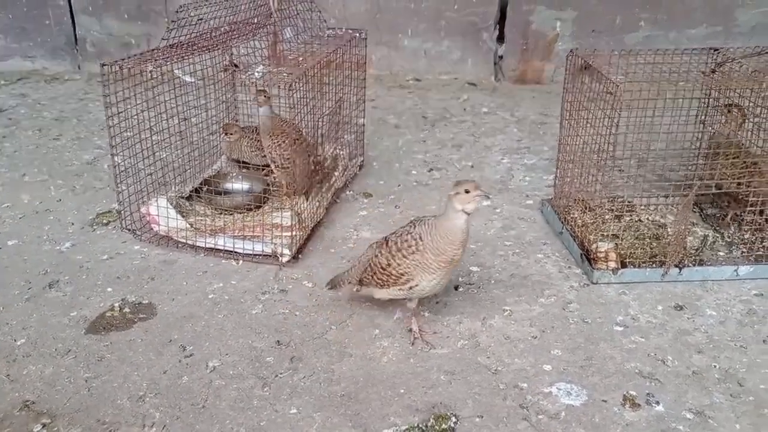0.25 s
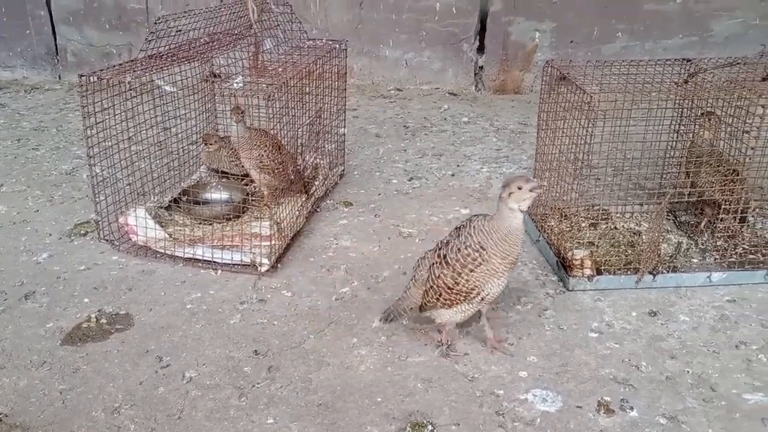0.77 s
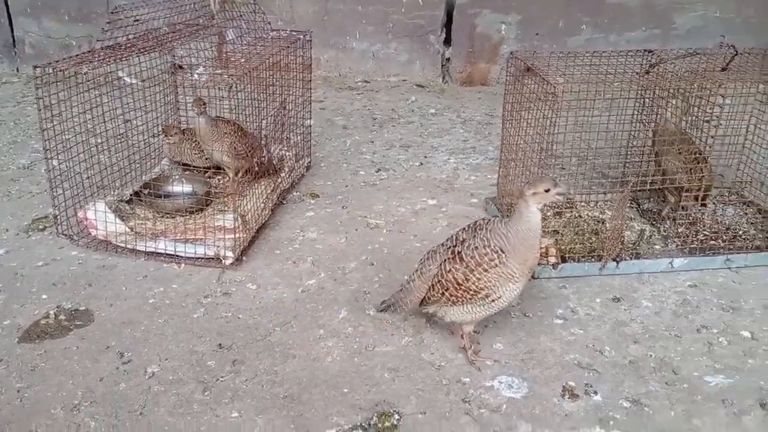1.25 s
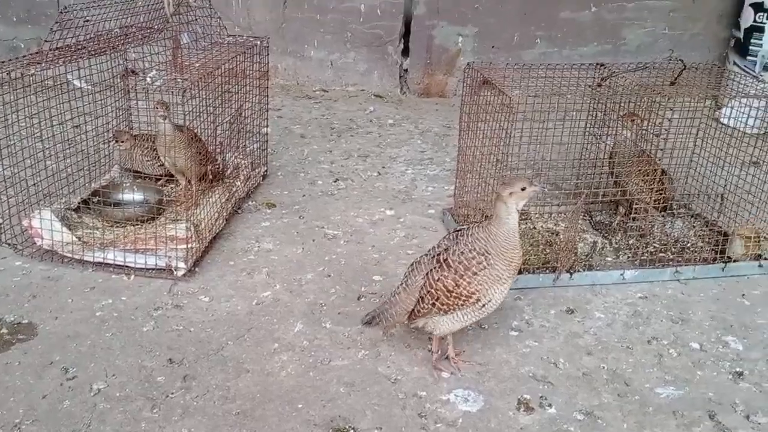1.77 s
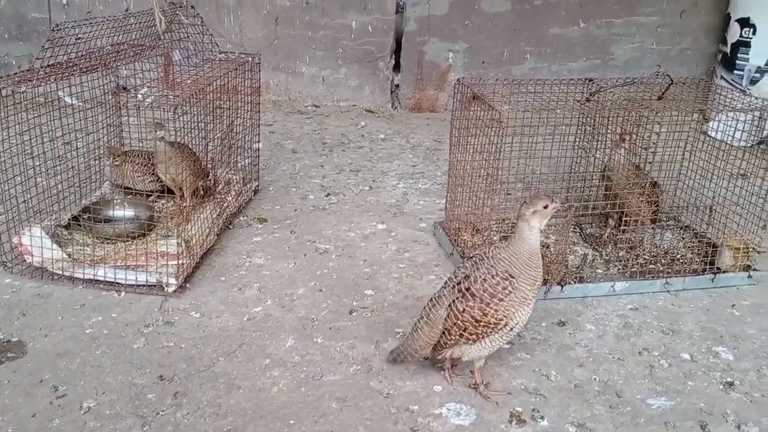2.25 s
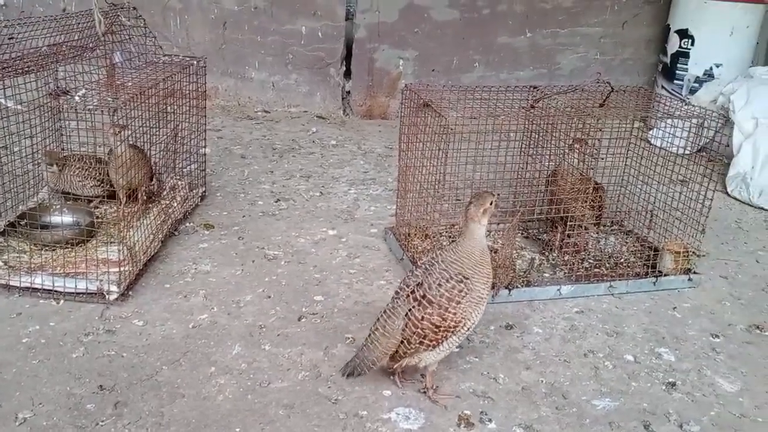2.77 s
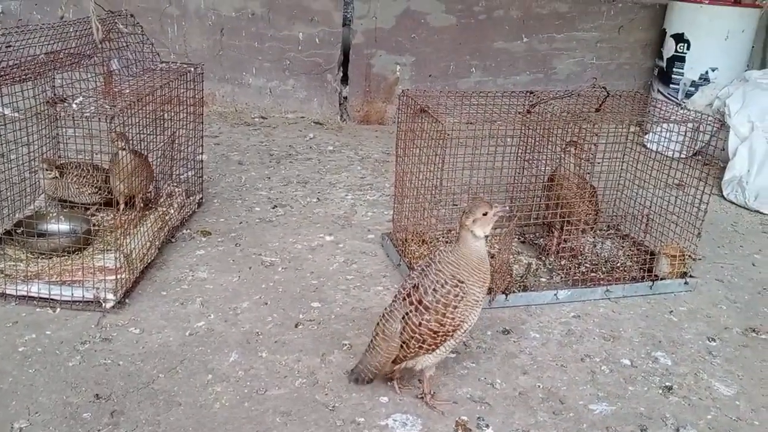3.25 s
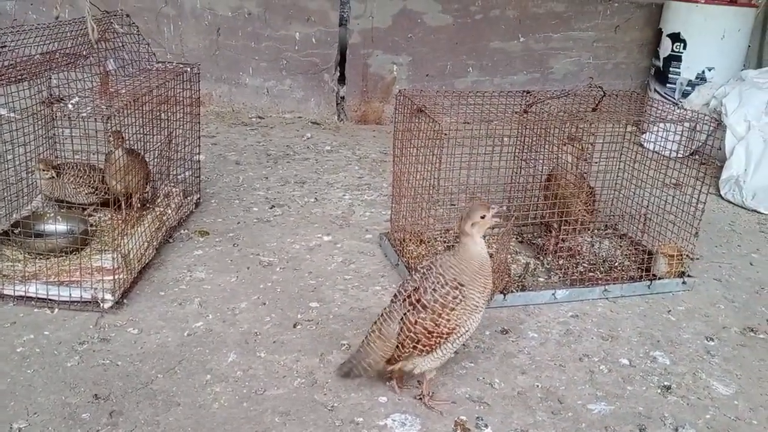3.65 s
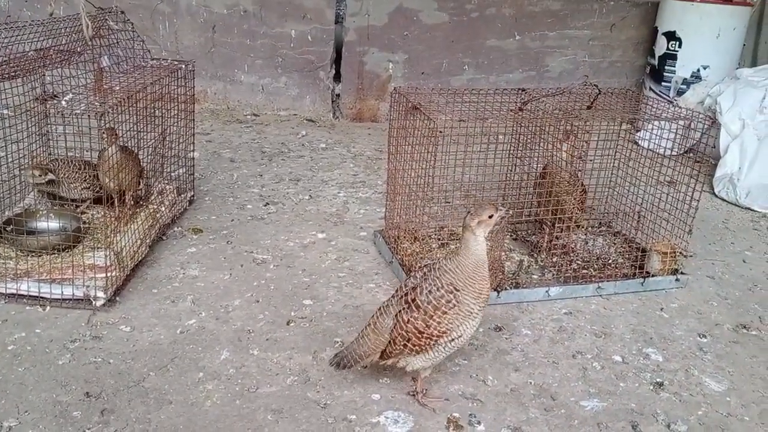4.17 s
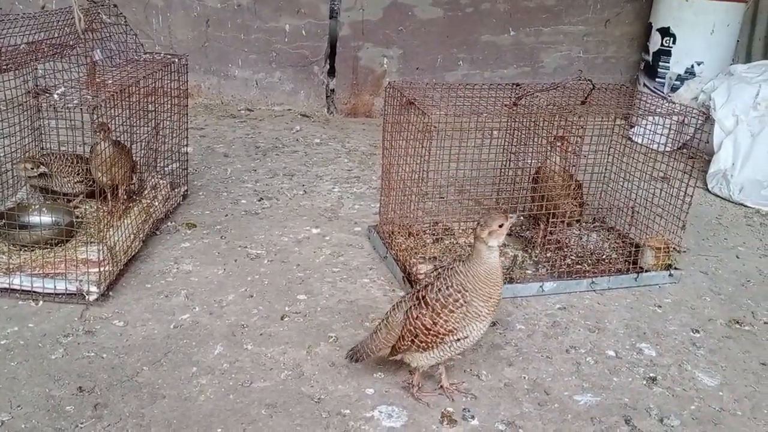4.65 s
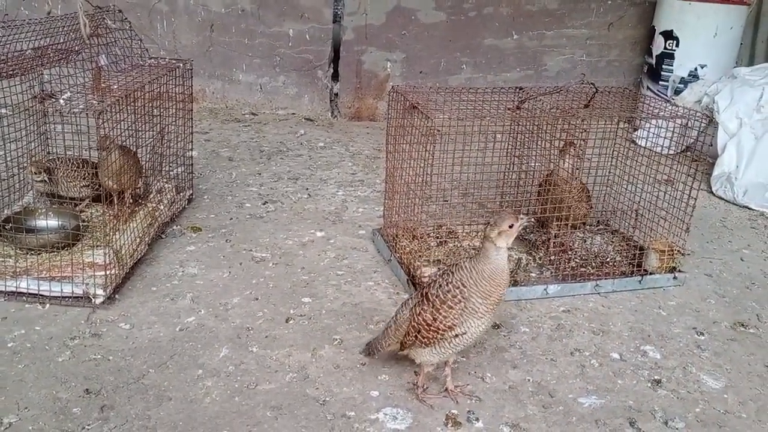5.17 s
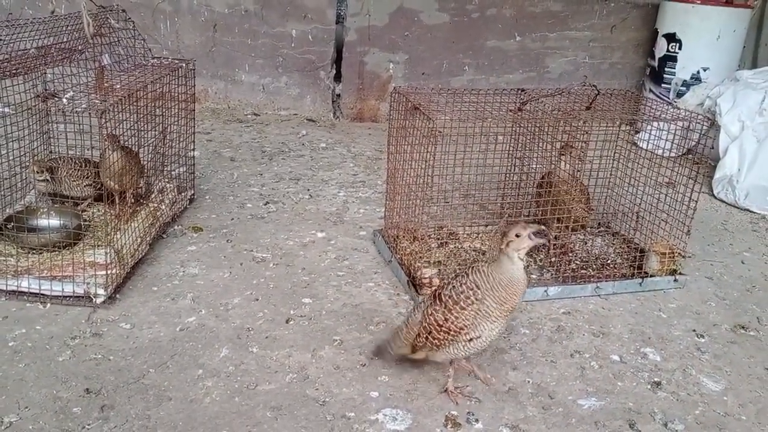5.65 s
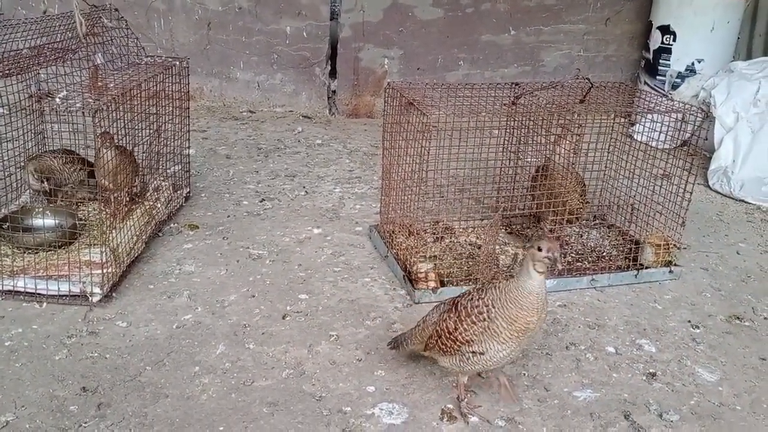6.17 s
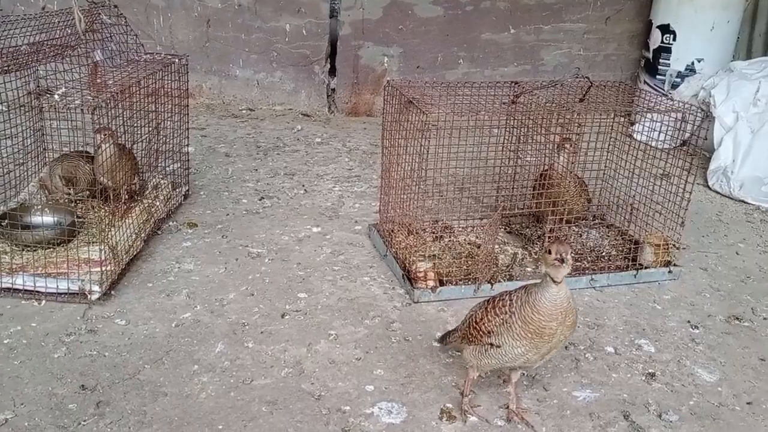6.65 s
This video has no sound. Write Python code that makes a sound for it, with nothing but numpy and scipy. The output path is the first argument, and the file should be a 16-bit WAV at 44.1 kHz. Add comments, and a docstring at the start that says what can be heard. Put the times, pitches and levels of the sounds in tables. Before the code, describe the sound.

Two partridge-like birds duet loudly in a hard-walled concrete yard. One, close to the phone, gives five short clear rising whistles in the first two and a half seconds. The other repeats a harsh cluck, a piercing high note that cracks, a strident falling note and low rasps, about every 0.6 seconds to the end. Short dense echoes, slight overload crackle, faint hollow knocks and low thumps.

```python
"""Two game birds in duet

One bird whistles a rising note near a phone in a walled concrete yard. The other repeats a harsh cluck,
a high note that breaks, a held note that falls, and low rasps. Notes are stacks of partials, blurred by
roughness, plus breath noise. Knocks are decaying sines; a scrape, low thumps and the floor are coloured noise.
The walls answer with dense noise tails; noise suppression, gain control and peak flattening follow."""
import sys
import numpy as np
from scipy import signal
from scipy.fft import rfft, irfft, next_fast_len
from scipy.io import wavfile
from scipy.ndimage import uniform_filter1d

SR = 44100
rng = np.random.default_rng(int(sys.argv[2]) if len(sys.argv) > 2 else 0)


def ratio(d):
    """dB to gain"""
    e = np.asarray(d, float) / 20
    return 10 ** e


def waveform_to_disk(signal):
    """Save audio, clipped to [-1, 1], as 16-bit WAV at the path in sys.argv[1]."""
    frames = np.transpose(np.atleast_2d(signal))
    scaled = np.clip(frames, -1, 1) * 32767
    samples = np.round(scaled).astype(np.int16)
    wavfile.write(sys.argv[1], SR, samples)


N = 304290

# rising whistles: start_s, length_s, level_db, pitch_start_hz, pitch_middle_hz, pitch_end_hz
WHISTLES = [(-.06, 0.16, -5, 3590, 3747, 4325), (.585, 0.16, -3.5, 2950, 3690, 4070),
            (1.162, 0.18, -2.5, 2794, 3552, 3990), (1.777, .165, -4.5, 3282, 3575, 4086),
            (2.42, 0.16, -6.5, 3456, 3750, 4094)]
# course of a whistle: share_of_length, level_db, other_partials_db, roughness_0_1
WHISTLE_COURSE = [(0, -24, 6, 0.5), (.18, -15, 1, 0.1), (0.332, -1, -1.5, 0.05), (0.601, 0.5, 10.5, 0.09),
                  (0.769, -17, 1.5, 0.22), (0.899, -11, 0.5, 0.24), (1, -18.5, 7, 0.4)]
# hoarse undertone, before its event factors: time_s, pitch_hz, level_db, other_partials_db, roughness_0_1
UNDERTONE = [(0, 2700, -6, 0.0045, .9), (.02, 2970, -5.5, 0, 1), (.08, 2804, -2.5, 0, 0.62),
             (.16, 2797, -9, 0.0022, .7)]
UNDERTONE_DB = -21.5  # re its whistle

# notes whose level beats with the walls' echo:
# start_s, time_to_first_peak_s, time_on_to_last_peak_s, first_peak_db, last_peak_db, pitch_hz
HIGH_NOTES = [(1.338, .035, .036, -5.5, -7, 3414), (2.42, 0.012, 0.066, -6, -3.5, 3515),
              (3.12, 0.035, 0.042, -7.5, -1.5, 3568), (3.683, 0.018, 0.051, -7.5, 4.5, 3558),
              (4.236, 0.023, 0.055, -7, 2, 3578), (4.95, 0.026, .05, -8, -1.5, 3584),
              (5.655, .024, .051, -5.5, -6, 3594), (6.228, 0.027, 0.051, -4.5, -5, 3597)]
HELD_NOTES = [(.235, 0.041, .027, -11, -8.5, 2496), (.82, 0.041, 0.04, -12, -4, 2550),
              (1.425, 0.045, 0.048, -8, -3, 2530), (2.06, 0.041, 0.061, -8.5, 1.5, 2508),
              (2.525, 0.06, .059, -10, 1, 2543), (3.24, 0.041, .055, -9, 1, 2548),
              (3.8, 0.051, .067, -8.5, 2, 2525), (4.35, .064, .046, -4.5, -3.5, 2516),
              (5.062, 0.051, .052, -5.5, -4, 2510), (5.77, 0.059, .036, -7.5, -8, 2522),
              (6.35, 0.053, .06, -6.5, -3, 2532)]
# beat: lead_in_db, soft_share_of_lead_in, dip_db, dip_place_0_1, other_partials_lead_in_db,
# other_partials_after_db, roughness_lead_in_0_1, roughness_after_0_1
HIGH_BEAT = (-6, 0.85, -6.5, 0.67, 5, 5, 0.25, 0.02)
HELD_BEAT = (-22, 0.68, -7.5, 0.56, 12.5, 0, .5, 0.3)
HIGH_LEAD_PITCH_FACTOR, HELD_LEAD_PITCH_FACTOR = 0.99, 1.05
BREAK_LEAD_S, BREAK_LEVEL_DB = 0.013, -15.5  # crack starts this long before the high note ends

# short syllables, before event factors: time_s, pitch_hz, level_db, other_partials_db, roughness_0_1
TICK = [(0, 2350, 1.5, -0.026, .05), (.005, 2440, -11.5, -0.09, .05), (.011, 2450, -5, -.1, .1)]
CLUCK = [(0, 2320, -5, -7, 0.8), (.008, 2300, 2, -12, 0.9), (.018, 2320, -2.5, 2, 0.7),
         (.032, 2200, -4, -6, 1), (.046, 2160, -19.5, 14.5, .9)]
BREAK = [(0, 2950, -4.5, -0.14, 1), (.008, 2900, 5.5, -0.073, .85), (.025, 2850, -3.5, -.1, .9),
         (.055, 2770, -10, -0.13, 0.87)]
SLIDE = [(0, 2520, 2.5, 0.3, 0.08), (.02, 2300, -6.5, -0.5, .15), (.045, 1950, -12.5, -7.5, 0.13),
         (.065, 1880, -31.5, -6, 0.26)]
STEP = [(0, 2100, -12, 18, .15), (.025, 2060, -8, 13, .2), (.038, 2010, 0, 0, .2), (.065, 1930, -9, -4, .4)]
RASP = [(0, 720, -24, -14, .15), (.01, 1050, -14, -9, .3), (.024, 1300, -6, -2, .7),
        (.042, 1400, -7, -4, .6), (.05, 1760, 0, -14, .22), (.075, 1700, 0, -15, .22),
        (.1, 1600, -9, -15, .25)]
# syllable events: start_s, level_db, pitch_factor, length_factor (later limited)
TICKS = [(2.373, -27, 0.9, 0.74), (3.075, -20.5, 1.01, 2.2), (3.636, -16.5, 1.01, 1.01),
         (4.186, -32, 2.4, 1.5), (4.9, -25.5, .99, 0.71), (5.605, -46, 1.1, 0.44), (6.181, -18, .99, 0.73)]
CLUCKS = [(.193, -16.5, 1.01, 1.36), (0.791, -15.5, 1.09, 0.91), (2.023, -16.5, 1.095, 1.7),
          (2.378, -17, 1.14, 0.93), (3.079, -16, 1.146, 0.75), (3.641, -14.5, 1.08, 1),
          (4.19, -19, 1.01, 1.094), (4.905, -15.5, 1.045, 0.82), (5.608, -19.5, 1.01, 1),
          (6.182, -16, 1.16, 0.97)]
SLIDES = [(0.298, -8.5, 0.96, 1.06), (.9, -5.5, 0.98, 1.24), (4.47, -10, 0.97, 1.22),
          (5.171, -6.5, 1, 0.51), (5.87, -7.5, 0.99, 1.4), (6.461, -4, 1, 0.93)]
STEPS = [(1.52, -18, 0.98, 1), (2.158, -15.5, .97, 0.82), (2.644, -14.5, 1.04, 0.89),
         (3.331, -13.5, 1.005, 0.9), (3.918, -16.5, 1.02, 0.98)]
RASPS = [(.43, -22, 0.76, 0.9), (1.034, -17, 0.95, 0.85), (1.636, -14.5, 1, 0.9),
         (2.266, -15.5, 1.037, 0.82), (2.768, -14, 1.054, 0.95), (2.924, -17.5, 0.94, 0.96),
         (3.474, -15.5, 0.9, 1), (4.052, -15.5, 1, 0.99), (4.601, -14, 1.013, 0.87),
         (4.768, -20, 0.85, 0.9), (5.296, -13.5, 1.01, 0.85), (5.456, -19.5, 0.89, 0.85),
         (6.018, -15.5, 0.94, 0.92), (6.606, -13, 0.98, 0.8), (6.766, -20.5, 0.77, 0.67)]

# partials 1, 2, 3, .. of each kind of note: level_db
WHISTLE_PARTIALS_DB = [0, -45]
TICK_PARTIALS_DB = [4.5, 10.5, 2]
CLUCK_PARTIALS_DB = [-6.5, -12.5, 1.5, -7.5, -13.5, -20.5]
HIGH_PARTIALS_DB = [3, -14.5, -50, -35.5]
BREAK_PARTIALS_DB = [-3, -19]
HELD_PARTIALS_DB = [-18, 1.5, -19, -14, -25.5, -20.5]
SLIDE_PARTIALS_DB = [-40, 2, -24, -13, -23.5, -21.5]
STEP_PARTIALS_DB = [-26, 0, -12, -26, -26, -22]
RASP_PARTIALS_DB = [-1.5, -9.5, -27]

# colour of the partials: frequency_hz, level_db
PARTIAL_COLOUR = [(500, -51), (800, -23), (1100, -2), (1800, 10.5), (3600, 17.5), (4500, 6.5), (5400, 13.5),
                  (7000, 15), (7800, -19), (9000, -69.5), (16000, -43)]
# spread of a rough partial: distance_hz, relative_db_per_hz
SHAKE = [(30, 13.5), (150, 9.5), (350, 0.5), (900, -21.5), (2500, -38.5)]
# breath noise: frequency_hz, relative_db_per_hz
BREATH = [(600, -44.5), (1000, -16), (1800, -15.5), (3500, 6), (4400, -13), (5500, -7.5), (7000, -12),
          (7800, -29), (9000, -41), (16000, -66.5)]

# knocks, before mixing: start_s, level_db, pitch_hz, t60_s
KNOCKS = [(0.164, -27, 374, 0.028), (0.174, -24, 372, 0.022), (2.962, -28, 578, 0.08),
          (3.037, -22.5, 395, 0.04), (4.817, -30, 550, 0.057), (5.48, -32, 514, 0.091),
          (5.905, -39, 520, 0.12), (5.984, -37, 410, 0.11), (6.018, -38, 360, 0.077),
          (6.51, -40, 450, 0.069), (6.571, -42, 469, .08), (6.621, -31, 525, 0.089),
          (6.77, -31.5, 565, 0.066), (6.879, -44, 287, 0.04)]
# claw scrape: frequency_hz, relative_db_per_hz
SCRAPE = [(500, -17), (1000, -8), (4000, -5), (7000, -22), (9000, -49.5)]
# energy of the walls' answer: time_s, relative_db
YARD = [(0, -1.5), (.02, 8.5), (.07, -1.5), (.12, -6.5), (.14, -9.5), (.3, -56), (.6, -57.5)]
# colour of the walls' answer: frequency_hz, level_db
WALLS = [(300, -6), (1100, -3), (1600, 2.5), (2500, 0), (3600, -4), (7000, -6)]
# low thumps: start_s, level_db, decay_s (to exp(-2))
THUMPS = [(0.319, -49, 0.04), (0.923, -41, 0.051), (1.345, -26, 0.022), (1.374, -35, 0.064),
          (1.501, -50, 0.036), (2.15, -45, 0.056), (2.446, -31, 0.04), (2.459, -17, 0.04),
          (2.495, -33.5, 0.05), (2.623, -34, 0.059), (3.15, -48.5, 0.066), (3.32, -32.5, 0.042),
          (3.729, -41, 0.031), (3.9, -35, 0.052), (4.294, -36.5, 0.033), (4.412, -27.5, 0.01),
          (4.443, -49.5, 0.11), (5.158, -49, 0.064), (5.876, -39.5, 0.052), (6.401, -36, 0.033),
          (6.463, -31, 0.039)]
# thump noise: frequency_hz, relative_db_per_hz
THUMP = [(25, -39.5), (70, -3.5), (130, 4), (250, -7), (500, -11), (1200, -27.5), (3000, -72.5)]
# background floor: frequency_hz, relative_db_per_hz
FLOOR = [(30, -9.5), (130, 1.5), (600, -7), (1300, -4.5), (2700, -23), (4400, -6.5), (7000, -11),
         (9000, -58.5), (13500, -26), (15800, -34.5)]


def unit(x):
    """Scale to rms 1."""
    return x / np.sqrt(np.mean(x ** 2) + 1e-20)


def along(points, hz):
    """Interpolate (Hz, value) points on a log frequency axis."""
    point_hz, values = np.transpose(points)
    return np.interp(np.log(hz + 1), np.log(point_hz + 1), values)


def filtered(x, response):
    """Weight the spectrum of x by a function of frequency."""
    size = next_fast_len(len(x) + 8192)
    spectrum = rfft(x, size) * response(np.fft.rfftfreq(size, 1 / SR))
    return irfft(spectrum, size)[:len(x)]


def noise(spectrum):
    """Coloured Gaussian noise of rms 1."""
    return unit(filtered(rng.standard_normal(N), lambda hz: ratio(along(spectrum, hz))))


def whistler():
    """Bird facing the phone: whistles upward over a hoarse, nearly level undertone."""
    share, course_db, others_db, rough = np.transpose(WHISTLE_COURSE)
    rising, under = [], []
    for start_s, length_s, level_db, *pitches_hz in WHISTLES:
        pitch_hz = np.polyval(np.polyfit([0, 0.5, 1], pitches_hz, 2), share)
        time_s = start_s + share * length_s
        rising.append(np.transpose([time_s, pitch_hz, level_db + course_db, others_db, rough]))
        under.append((start_s, level_db + UNDERTONE_DB, 1, 1))
    return voice((rising, WHISTLE_PARTIALS_DB, 1, -5),
                 (placed(UNDERTONE, under), WHISTLE_PARTIALS_DB, 1, -8))


def caller():
    """Bird calling toward the wall: high and held notes and short syllables; clucks and rasps breathiest."""
    breaks = [(start_s + rise_s + hold_s - BREAK_LEAD_S, BREAK_LEVEL_DB, 1, 1)
              for start_s, rise_s, hold_s, *_ in HIGH_NOTES]
    high = echo_beaten(HIGH_NOTES, HIGH_LEAD_PITCH_FACTOR, HIGH_BEAT)
    held = echo_beaten(HELD_NOTES, HELD_LEAD_PITCH_FACTOR, HELD_BEAT)
    # notes, partial levels, number of the partial that carries the pitch, breath_db
    return voice((placed(TICK, TICKS), TICK_PARTIALS_DB, 1, -14),
                 (placed(CLUCK, CLUCKS), CLUCK_PARTIALS_DB, 2, -3),
                 (high, HIGH_PARTIALS_DB, 1, -14),
                 (placed(BREAK, breaks), BREAK_PARTIALS_DB, 1, -7),
                 (held, HELD_PARTIALS_DB, 2, -15),
                 (placed(SLIDE, SLIDES), SLIDE_PARTIALS_DB, 2, -14),
                 (placed(STEP, STEPS), STEP_PARTIALS_DB, 2, -14),
                 (placed(RASP, RASPS), RASP_PARTIALS_DB, 1, -2))


def echo_beaten(notes, lead_pitch_factor, beat):
    """Soft lead-in, then a level that beats with the walls' echo, drawn as peak, dip, peak."""
    lead_db, soft, dip_db, place, early_db, late_db, hoarse, rough = beat
    soft, place = np.clip([soft, place], 0.1, 0.9)
    shaped = []
    for start_s, rise_s, hold_s, first_db, last_db, hz in notes:
        lead_hz, peak_s = hz * lead_pitch_factor, start_s + rise_s
        shaped.append([
            (start_s, lead_hz, first_db + lead_db, early_db, hoarse),
            (start_s + soft * rise_s, lead_hz, first_db + lead_db / 2, early_db, hoarse),
            (peak_s, hz, first_db, late_db, rough),
            (peak_s + place * hold_s, hz, min(first_db, last_db) + dip_db, late_db, rough),
            (peak_s + hold_s, hz, last_db, late_db, rough)])
    return shaped


def placed(shape, events):
    """Move, stretch and transpose a syllable for each event."""
    return [np.array(shape) * [np.clip(length, 0.75, 1.3), pitch, 1, 1, 1] + [start_s, 0, level_db, 0, 0]
            for start_s, level_db, pitch, length in events]


def voice(*kinds):
    """One dry bird: sums its notes; a high-pass keeps the lows dark."""
    out = np.zeros(N)
    shake = (noise(SHAKE) + 1j * noise(SHAKE)) / np.sqrt(2)
    breath = noise(BREATH)
    for notes, partials_db, order, breath_db in kinds:
        for rows in notes:
            add_note(out, rows, partials_db, order, shake, ratio(breath_db) * breath)
    return filtered(out, lambda hz: 1 / (1 + (750 / (hz + 1)) ** 6))


def add_note(out, rows, partials_db, order, shake, breath):
    """Add a harmonic stack whose partial number `order` has the given pitch; roughness smears partials."""
    time_s, *columns = np.transpose(rows)
    at = np.arange(max(round(time_s[0] * SR), 0), min(round(time_s[-1] * SR), N))
    hz, level_db, others_db, rough = [np.interp(at / SR, time_s, c) for c in columns]
    rough = np.clip(rough, 0, 1)
    k = np.arange(1, len(partials_db) + 1)[:, None]
    carrier = np.exp(2j * np.pi * k * np.cumsum(hz / order) / SR)
    # higher partials are smeared more, and over a wider band
    noise_share = 1 - (1 - rough) ** (k / order)
    wobble = shake[(at * k // order + k * SR) % N]
    smear = np.sqrt(1 - noise_share) + np.sqrt(noise_share) * wobble
    colour_db = along(PARTIAL_COLOUR, k * hz / order) - along(PARTIAL_COLOUR, hz)
    partial_db = np.array(partials_db)[:, None] + (k != order) * others_db + colour_db
    stack = ratio(partial_db) * (carrier * smear).imag
    # 4 ms fades; no fade-in on a note already sounding at time 0
    since_start = at - at[0] + (at[0] == 0) * SR
    edge = np.clip(np.minimum(since_start, at[-1] - at) / (0.004 * SR), 0, 1)
    out[at] += ratio(level_db) * edge * (np.sqrt(2) * stack.sum(0) + rough * breath[at])


def knocks():
    """Dull hollow knocks: decaying sines with a soft contact."""
    out, t = np.zeros(N + SR), np.arange(SR // 4) / SR
    for start_s, level_db, hz, t60_s in KNOCKS:
        decay = ratio(level_db - 60 * t / max(t60_s, 0.01))
        contact = 1 - np.exp(-t / 0.006)
        out[round(start_s * SR):][:len(t)] += decay * contact * np.sin(2 * np.pi * hz * t)
    return out[:N]


def scrape():
    """A claw scrapes the concrete: a short gated burst of coloured noise."""
    start_s, length_s, level_db = 0.153, 0.038, -33.5
    share = (np.arange(N) / SR - start_s) / length_s
    return ratio(level_db) * ((share > 0) & (share < 1)) * noise(SCRAPE)


def yard(x):
    """The walls' dense answer: noise tails, redrawn every quarter second."""
    t, hop = np.arange(int(0.6 * SR)) / SR, SR // 4
    shape = ratio(np.interp(t, *np.transpose(YARD)))
    window = np.sqrt(np.hanning(2 * hop))
    padded = np.pad(x, (hop, 2 * hop))
    out = np.zeros(N + 4 * hop + len(t))
    for at in range(0, N + hop, hop):
        tail = shape * rng.standard_normal(len(t)) / np.linalg.norm(shape)
        piece = signal.fftconvolve(padded[at:at + 2 * hop] * window, tail)
        out[at:at + len(piece)] += piece
    return out[hop:hop + N]


def thumps():
    """Low thumps: noise under gates with a quick rise and Gaussian decay."""
    gate = np.zeros(N + SR)
    for start_s, level_db, decay_s in THUMPS:
        t = np.arange(round(3 * decay_s * SR)) / (decay_s * SR)  # in units of decay_s
        gate[round(start_s * SR):][:len(t)] += ratio(level_db) * np.minimum(1, t / 0.047) * np.exp(-2 * t ** 2)
    return gate[:N] * noise(THUMP)


def floor():
    """Faint steady coloured noise."""
    return ratio(-60) * noise(FLOOR)


def scene():
    """Mix birds, knocks and scrape with the yard's answer, thumps and floor."""
    facing = whistler()
    turned = caller() + knocks() + scrape()
    answer = yard(ratio(-11.5) * facing + ratio(-5.5) * turned)
    walls = filtered(answer, lambda hz: ratio(along(WALLS, hz)))
    return (facing + ratio(-2.5) * turned + walls + thumps() + floor())[None]


def suppressed(x, quiet_db, depth_db):
    """Noise suppressor: turns down time-frequency cells whose smoothed power stays near the floor."""
    cells = signal.stft(x, nperseg=512)[2]
    power = uniform_filter1d(np.abs(cells) ** 2, size=5, axis=-1)  # over time
    power = np.abs(uniform_filter1d(power, size=3, axis=-2)) + 1e-20  # over frequency
    keep = np.clip(1 - ratio(2 * quiet_db) / power, ratio(depth_db), 1)
    return signal.istft(cells * keep, nperseg=512)[1][..., :N]


def gain_control(x, knee_db, unity_db, slope_db_per_db, window_s):
    """Turns loud moments down by their smoothed level; the tails come up again after them."""
    power = np.abs(uniform_filter1d(x ** 2, round(window_s * SR)))
    level_db = 10 * np.log10(power + 1e-12)
    return x * ratio(-slope_db_per_db * (np.maximum(level_db, knee_db) - unity_db))


def overloaded(x):
    """Input overload: flattens the highest peaks, which makes bright ticks."""
    return x / (1 + np.abs(x / 0.67) ** 9) ** (1 / 9)


def top_cut(x):
    """Nothing passes above the cut-off."""
    return signal.sosfilt(signal.butter(12, 16010, fs=SR, output="sos"), x)


def record(dry):
    """Phone input: noise suppressor, gain control, then overload."""
    clean = suppressed(dry, quiet_db=-78, depth_db=-11)
    even = gain_control(clean, knee_db=-29.5, unity_db=-13.5, slope_db_per_db=0.32, window_s=0.031)
    mix = overloaded(even)
    return top_cut(mix)


dry = scene()
out = record(dry)
waveform_to_disk(out)
```